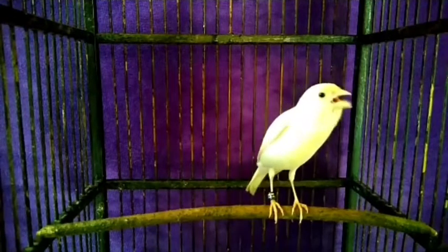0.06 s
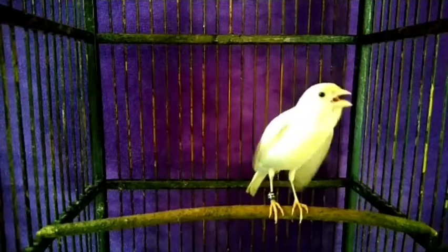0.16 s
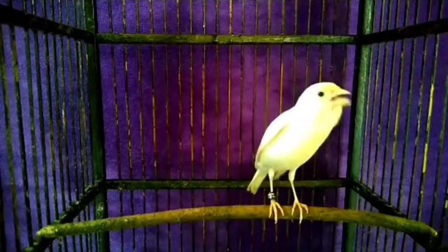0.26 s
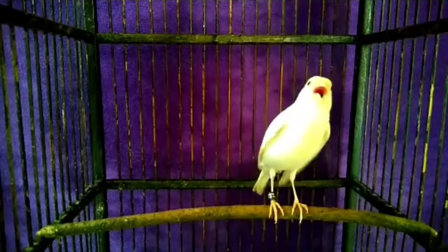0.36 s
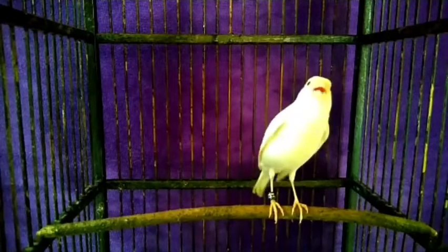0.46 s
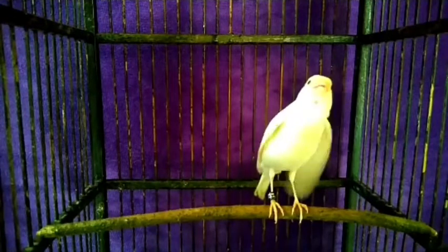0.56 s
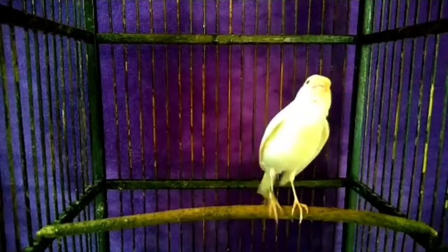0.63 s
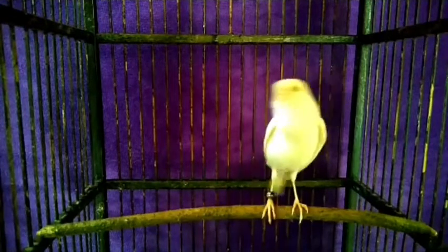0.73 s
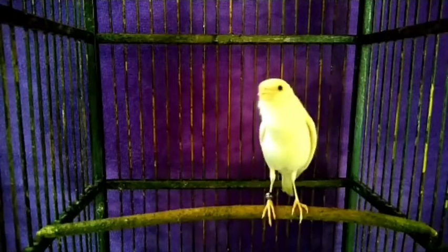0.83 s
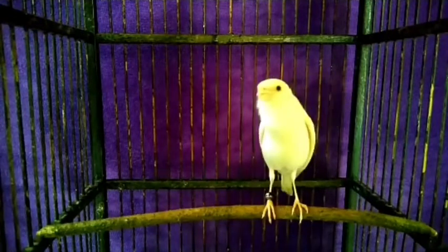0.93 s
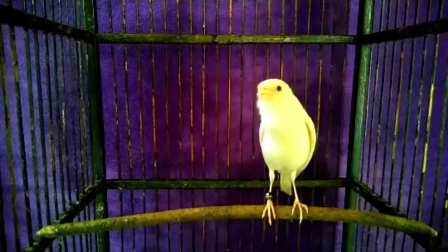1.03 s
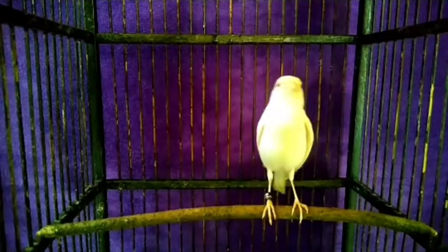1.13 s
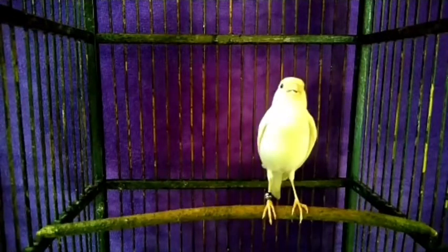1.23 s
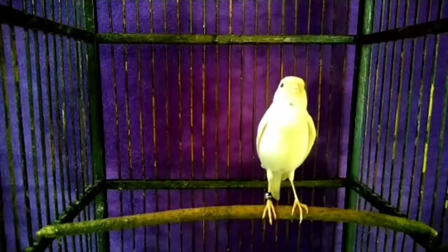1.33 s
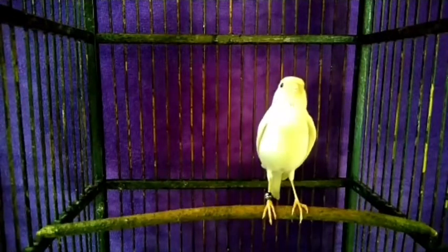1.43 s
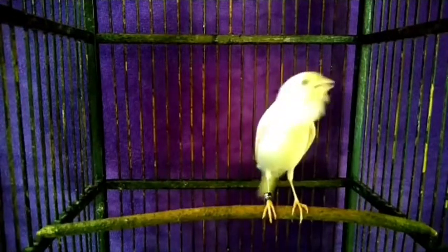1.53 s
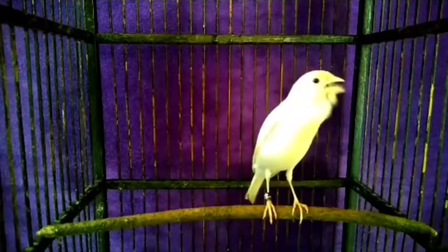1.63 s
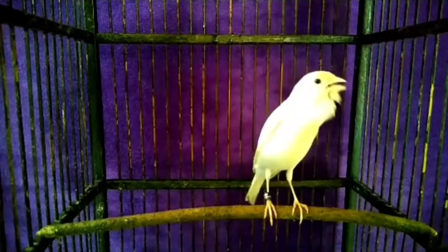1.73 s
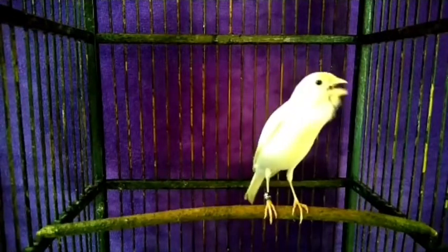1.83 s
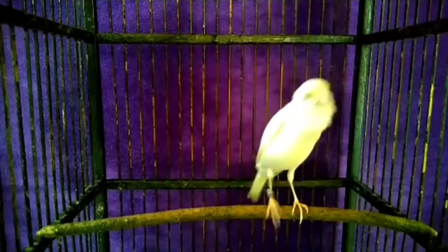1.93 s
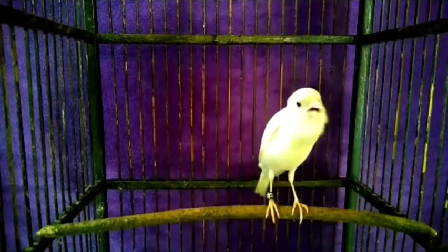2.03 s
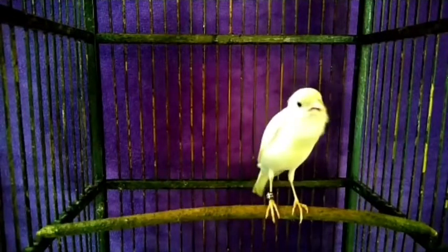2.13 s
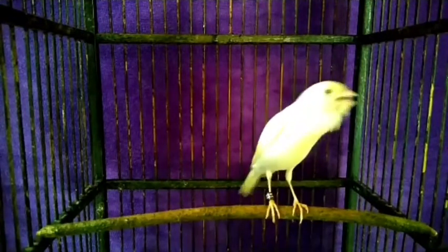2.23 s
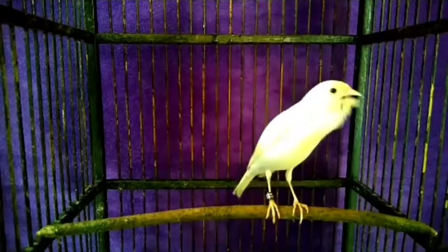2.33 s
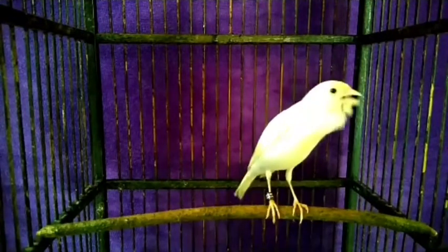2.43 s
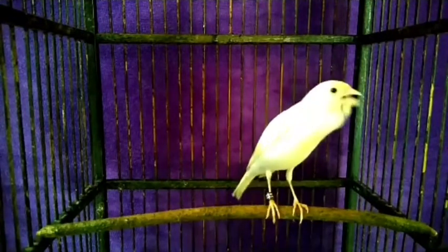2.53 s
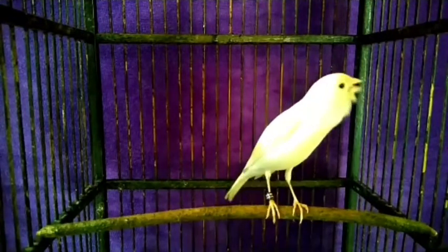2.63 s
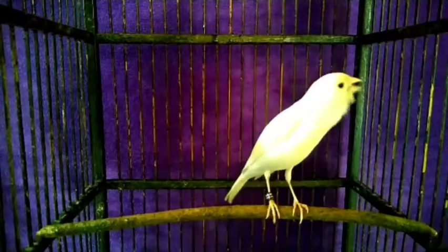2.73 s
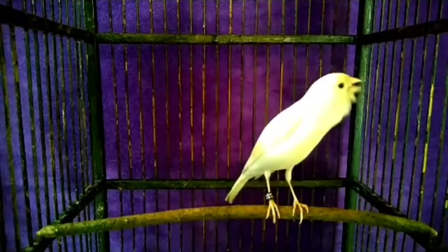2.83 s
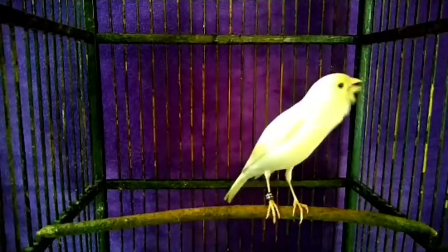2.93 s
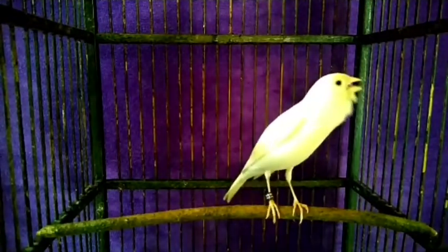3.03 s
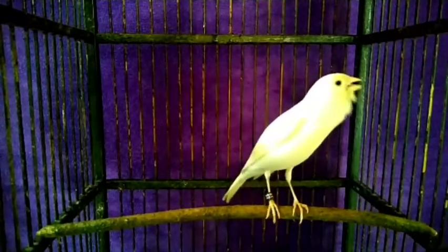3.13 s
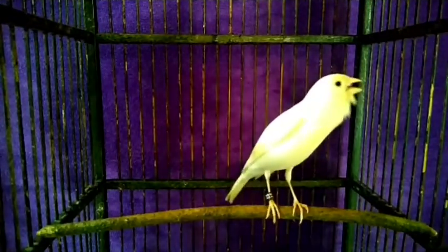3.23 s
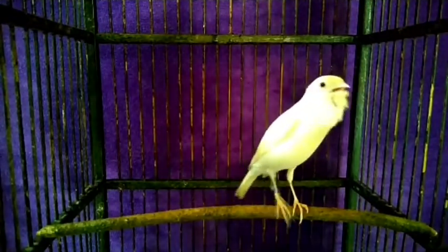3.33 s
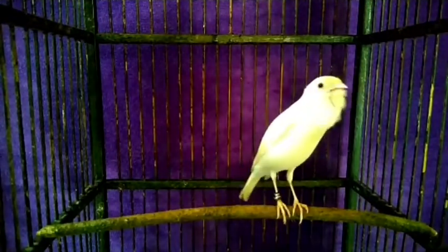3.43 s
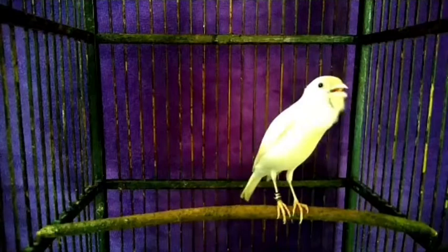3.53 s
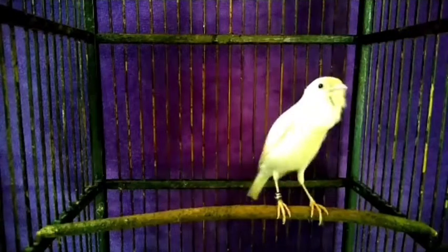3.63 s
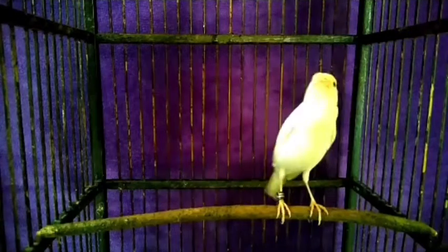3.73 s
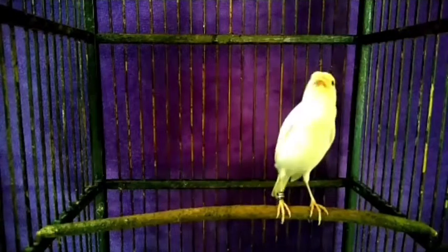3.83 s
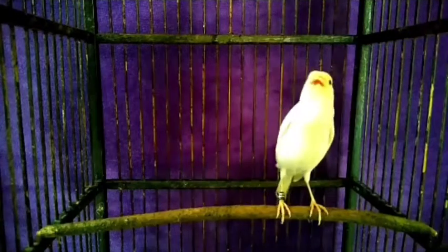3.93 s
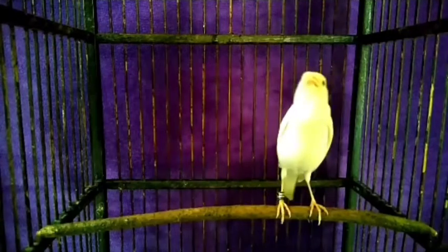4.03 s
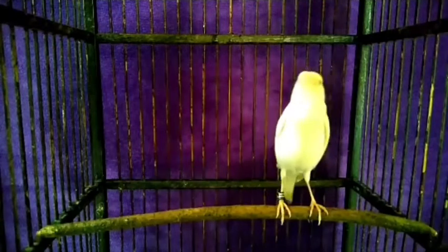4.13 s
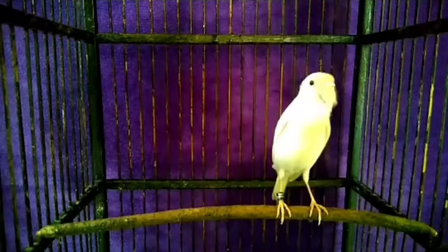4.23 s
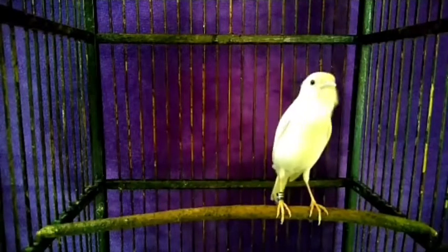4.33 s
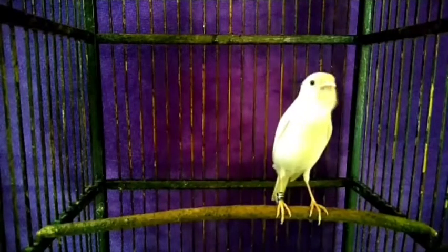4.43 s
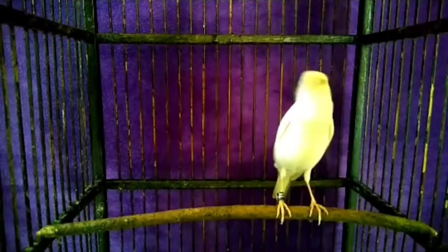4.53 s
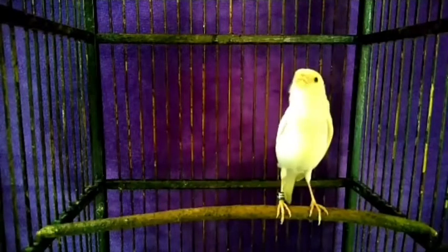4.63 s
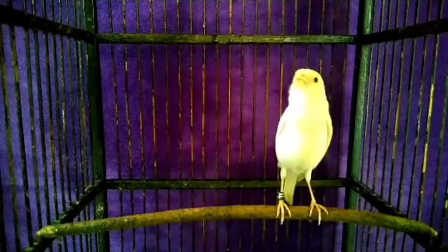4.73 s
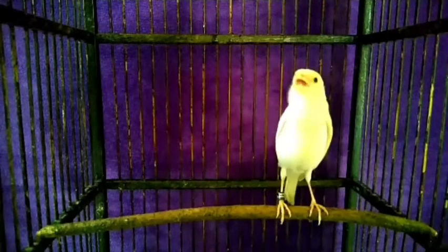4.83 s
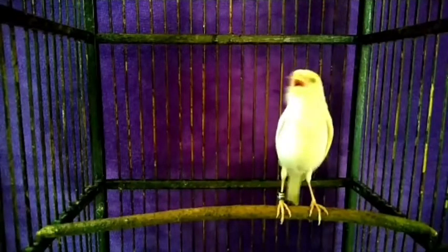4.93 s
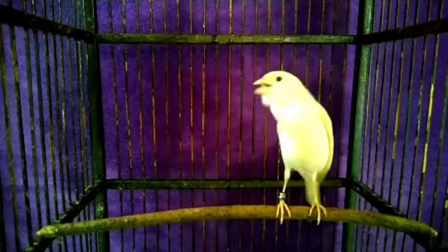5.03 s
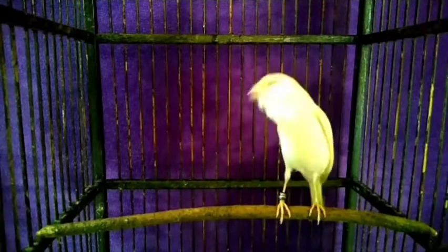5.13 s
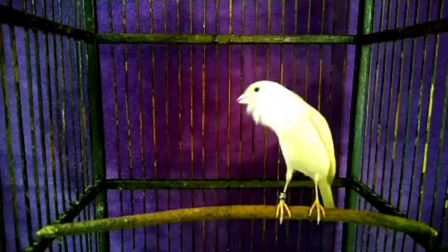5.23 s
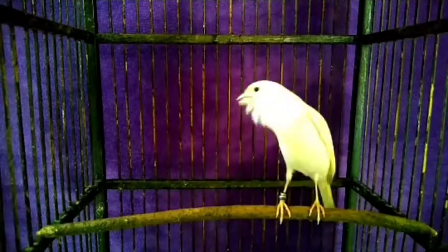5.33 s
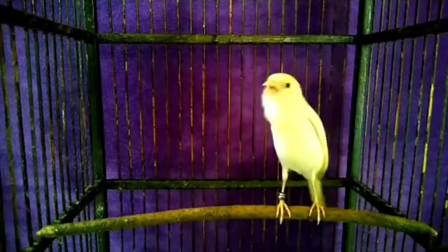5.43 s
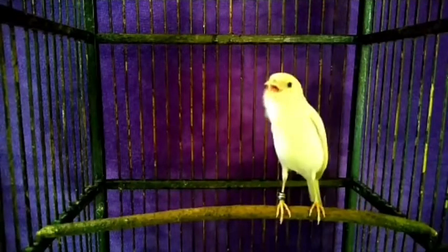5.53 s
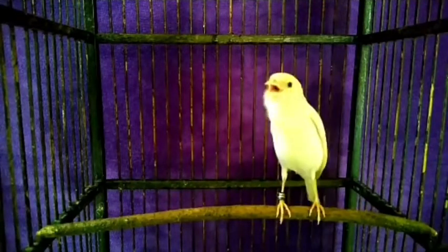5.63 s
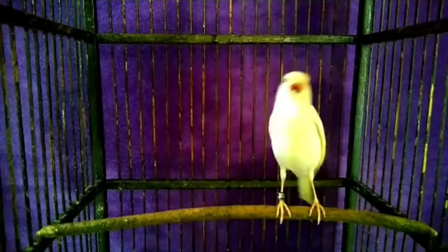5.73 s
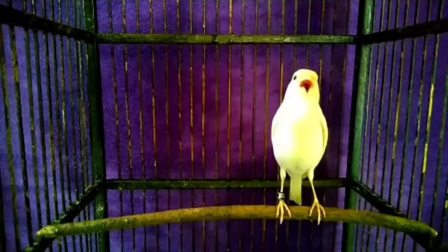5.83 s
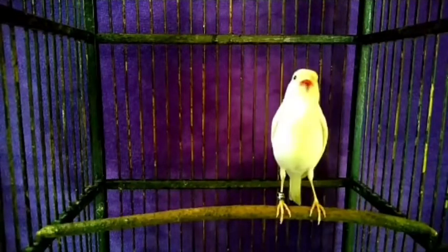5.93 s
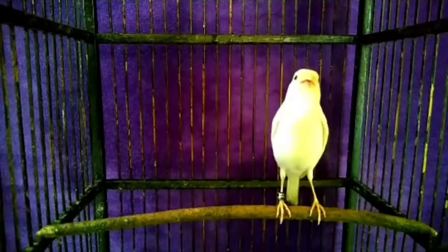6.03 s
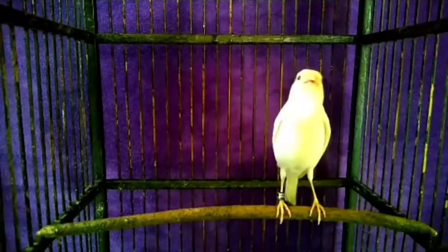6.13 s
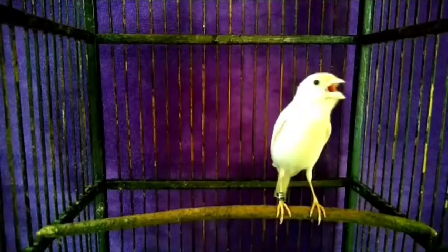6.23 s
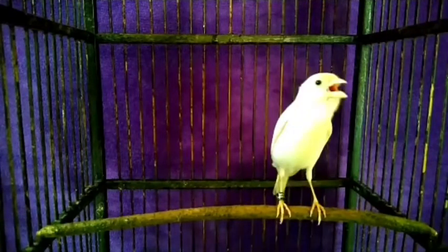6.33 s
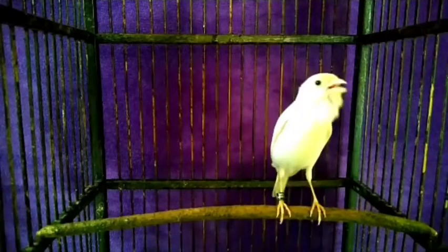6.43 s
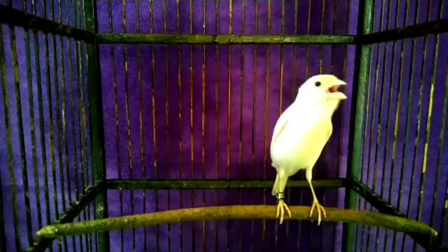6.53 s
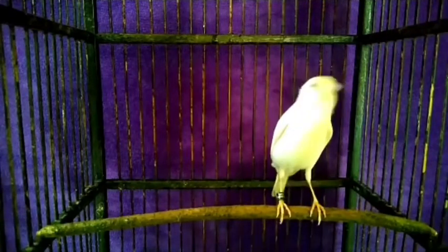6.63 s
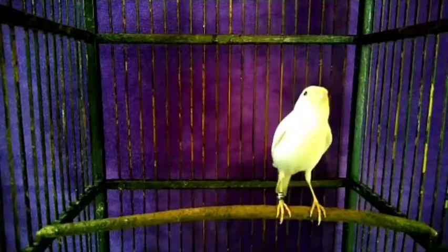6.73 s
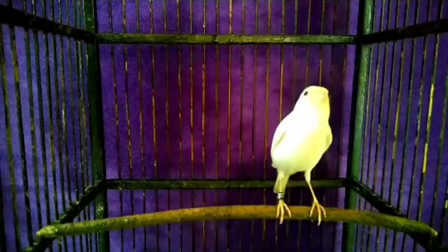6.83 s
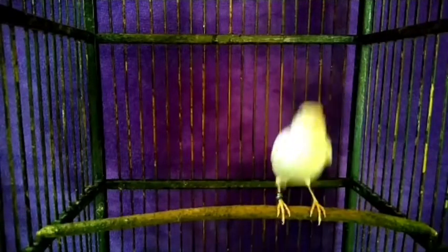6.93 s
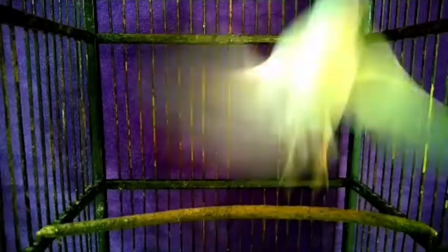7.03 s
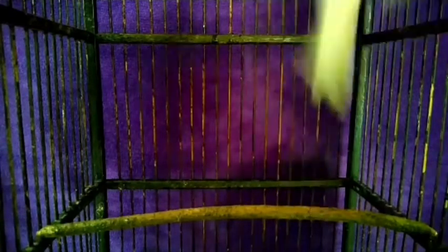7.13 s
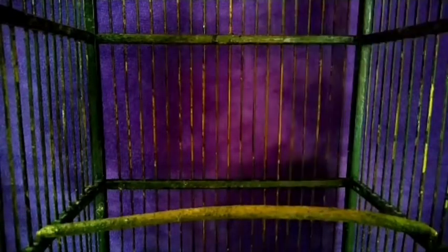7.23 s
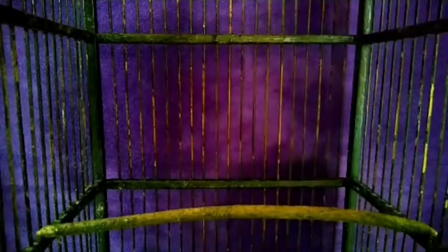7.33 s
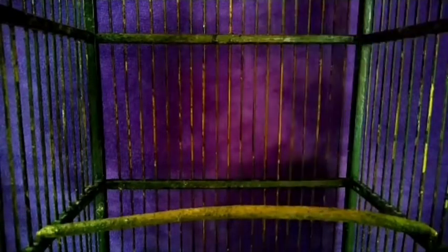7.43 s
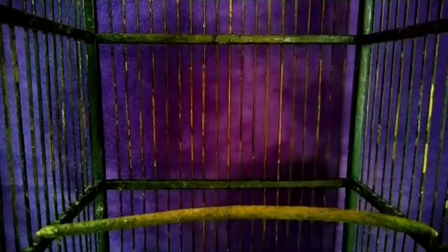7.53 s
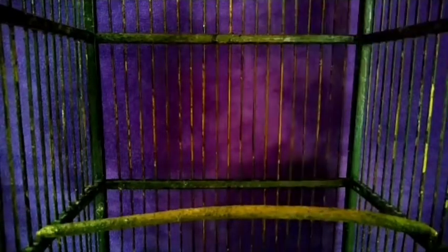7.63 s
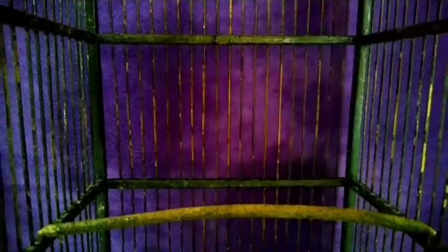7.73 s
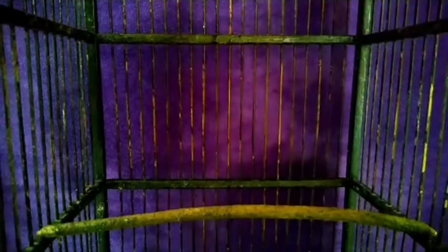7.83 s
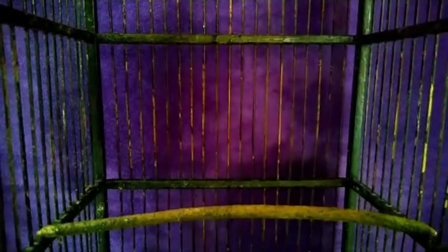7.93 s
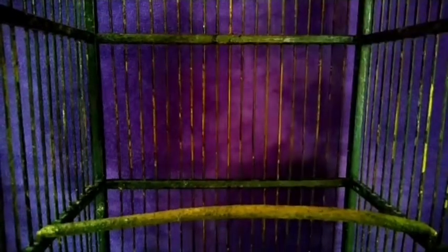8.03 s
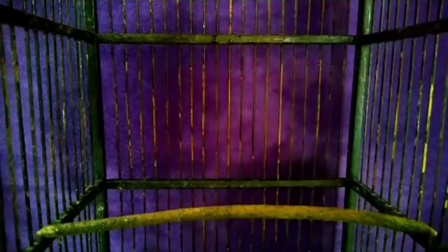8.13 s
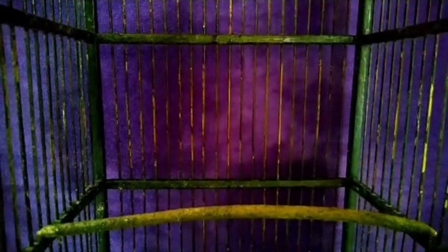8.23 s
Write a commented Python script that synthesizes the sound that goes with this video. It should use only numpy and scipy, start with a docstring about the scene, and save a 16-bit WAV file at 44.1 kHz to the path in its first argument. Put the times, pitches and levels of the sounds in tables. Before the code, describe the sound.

Bright, slightly overloaded canary song of whistles and fast gliding trills in a small hard room, ending in wing flutter, cage knocks and faint distant bird calls.

```python
"""Caged canary in a small hard room

A close canary sings rising whistles, then fast trills of gliding syllables; a dove and small birds call far off.
Each trill repeats one learnt gesture of the syrinx: a nearly pure tone along pitch and level curves.
Dense noise echoes make the room ring on at the song's pitches; loud notes overload the microphone.
Late on, the bird flutters off its perch: puffs of low-pitched noise, and knocks that ring the cage's modes."""
import sys
import numpy as np
from scipy import signal
from scipy.fft import rfft, irfft
from scipy.io import wavfile
from scipy.ndimage import uniform_filter1d, minimum_filter1d

SR = 44100
rng = np.random.default_rng(int(sys.argv[2]) if len(sys.argv) > 2 else 0)


def log_audio(samples):
    """Write samples as a 16-bit WAV file to the path given in sys.argv[1]."""
    # one column per channel
    frames = np.atleast_2d(samples).T
    # limit to full scale, then quantise
    limited = np.clip(frames, -1, 1)
    pcm = np.round(limited * 32767).astype(np.int16)
    wavfile.write(sys.argv[1], SR, pcm)


N = 364707
T_S = np.arange(N) / SR

# Levels in the tables are relative; pitch factors and lengths rescale the gestures.
# Syllable gestures of the syrinx: t/s, f/Hz, level/dB
WHISTLE_GESTURE = [(0, 3953, -23.5), (.004, 4682, 2), (.012, 4520, -1), (.022, 4820, -16),
                   (.046, 5720, -25.5), (.055, 6314, -16), (.061, 6815, -5.5), (.085, 7167, -7.5),
                   (.11, 7490, -0.5), (.138, 7550, -5), (.155, 7385, -15.5)]
CHIP_GESTURE = [(0, 3835, -18), (.0034, 3400, -3.5), (.0068, 3093, 3), (.01, 2882, 3), (.0122, 2450, -5),
                (.0142, 2049, -10.5), (.0175, 1760, -35)]
SWEEP_GESTURE = [(0, 6029, -23), (.004, 5635, 2.5), (.009, 5183, 0.5), (.013, 4781, 1), (.019, 4348, -2.5),
                 (.024, 4062, -2.5), (.029, 3700, -3.5), (.033, 3443, 2), (.038, 3340, -11.5)]
ARCH_GESTURE = [(0, 3653, -19.5), (.0022, 4439, 10.5), (.005, 5049, 1), (.008, 5951, -15.5),
                (.011, 4891, -9), (.019, 4600, -18.5), (.031, 4005, -2.5), (.04, 3534, -9)]
DROP_GESTURE = [(0, 3038, -28), (.004, 2902, -6), (.0085, 2793, 0), (.011, 2327, -9.5), (.013, 1980, -2.5),
                (.016, 1450, -20), (.021, 946, -36)]
SLUR_GESTURE = [(0, 4582, -23), (.005, 5137, -11.5), (.014, 6214, -23.5), (.031, 5475, -13),
                (.045, 4618, 2), (.054, 4349, -4), (.064, 3633, -22)]
HIGH_GESTURE = [(0, 8150, -23.5), (.006, 7560, -3), (.02, 6929, 2.5), (.03, 5950, -17.5), (.0395, 5050, 6),
                (.046, 4750, -27.5)]
LOW_GESTURE = [(0, 3818, -26.5), (.0055, 3400, -12), (.008, 3243, -2), (.013, 3033, 0.5),
               (.0152, 2550, -15.5), (.0178, 2236, -8.5), (.022, 1676, -33)]
RISE_GESTURE = [(0, 4391, -10), (.009, 4799, -2.5), (.022, 5051, -1.5), (.034, 5805, -4), (.048, 6825, 2),
                (.068, 6980, 1), (.088, 6850, -1.5), (.1, 6716, -18)]

# Syllables placed one by one: start/s, length/s, pitch factor, level/dB
WHISTLE_SYLLABLES = [(-.021, 0.139, 0.9996, 0.5), (.157, 0.151, 0.999, 0.5), (.343, .152, 0.9996, 1)]
LEAD_DROP_SYLLABLE = [(3.485, .014, 1, 1)]  # leads into the alternating trill
SLUR_SYLLABLES = [(4.712, 0.0559, 0.9034, -0.74), (4.82, 0.062, 0.9893, 2.3), (4.943, .064, 1.03, .3),
                  (5.071, 0.0629, 1.0226, -1.64)]
RISE_SYLLABLES = [(6.207, .111, .995, 1.32), (6.355, .091, 1.012, 0.54), (6.507, .09, 1.015, 1.2)]

# Trill tempo, slackening overall: t/s, time to the next syllable/s
CHIP_TEMPO = [(0.5599, 0.0283), (0.589, 0.0348), (0.7, 0.038), (0.86, 0.0424), (1.03, 0.0437),
              (1.2, 0.0447)]
SWEEP_TEMPO = [(1.5604, 0.0635), (1.625, 0.0644), (1.9, 0.0646), (2.5, 0.066), (2.7, 0.0675),
               (2.95, 0.0694), (3.15, 0.0695), (3.29, 0.0755)]
ARCH_TEMPO = [(3.5172, 0.0759), (3.75, 0.0793), (3.91, 0.079), (4.15, 0.0867), (4.3, 0.0955),
              (4.45, 0.0926), (4.612, 0.0972)]
HIGH_TEMPO = [(5.2063, 0.1118), (5.43, 0.1095), (5.65, 0.1099), (5.87, 0.1127), (6.095, 0.1143)]

# Change of the syllables along a trill: t/s, syllable length/s, pitch factor, level/dB
CHIP_COURSE = [(0.55, 0.0079, 0.874, -12), (0.588, 0.01123, 0.981, 2), (0.697, 0.01605, 0.9615, 4),
               (0.867, 0.0211, 0.9642, 4), (1.028, .02, 0.9787, 4.5), (1.205, 0.02038, 0.975, 2)]
SWEEP_COURSE = [(1.56, .039, 0.9695, -5), (1.625, 0.034, 1, 1), (1.9, 0.03796, 1.0028, 3.5),
                (2.5, .036, 1.0065, 2.5), (2.7, 0.0372, 1.015, -4), (2.851, .04, 0.971, -1.5),
                (2.95, 0.03815, 1.011, -1), (3.08, .04, 1, -2), (3.146, 0.0347, 1.0435, -1.5),
                (3.22, 0.03944, 0.9894, -2), (3.44, 0.0377, 0.985, -2)]
ARCH_COURSE = [(3.517, 0.03398, 0.997, -5.5), (3.75, 0.03506, 0.98, -2), (3.91, 0.0358, 0.9824, -6),
               (4.15, 0.0394, 1.012, -1), (4.301, .043, 1.01, 1), (4.45, 0.04257, 1.0046, 4.5),
               (4.612, 0.05026, 1.027, -1)]
HIGH_COURSE = [(5.206, 0.0415, 0.9686, -1), (5.431, 0.0416, 0.9875, 3), (5.651, 0.04012, 0.9878, 1.5),
               (5.87, .043, 0.9737, 3.5), (6.095, 0.03886, 0.981, 2)]
# Same columns, for the low syllables that answer the high ones
DROP_COURSE = [(3.56, 0.0193, 0.9935, 2), (3.72, 0.02024, 1, 1.5), (3.85, 0.0202, 0.947, -0.5),
               (4.2, 0.01898, 0.9564, -.5), (4.47, .02, .97, 0.5), (4.67, 0.01993, 0.971, -1)]
LOW_COURSE = [(4.78, 0.02173, 0.795, 0), (4.89, 0.0193, 0.8996, 0.5), (5.05, 0.02317, 0.9537, 2.5),
              (5.3, 0.01794, 0.992, -.5), (5.55, .021, 0.9852, -0.5), (6.14, 0.02156, 0.96, -3)]
DROP_GAP_S, LOW_GAP_S = 0.0075, 0.007  # pause before the answer

# Single notes that slide to a held pitch: start/s, length/s, first f/Hz, held f/Hz, slide/s, level/dB
SLIDE_NOTES = [(0, 0.0135, 4668, 4450, 0.0037, 2.5), (1.315, 0.0292, 5170, 5840, 0.0016, 4.5),
               (1.362, 0.092, 2617, 2487, 0.01408, -5.5), (1.432, 0.1044, 2530, 2503, 0.0192, -8),
               (3.215, 0.01224, 4304, 5315, 0.00153, 1), (3.362, 0.0092, 4218, 5092, .002, 4),
               (3.439, .012, 4294, 4902, .002, 7), (6.319, 0.0317, 6926, 2779, .004, -2.5),
               (6.483, 0.0375, 3414, 3594, 0.00455, -1)]
ATTACK_SHARE, RELEASE_SHARE, EDGE_DB = 0.11, 1, -17  # shares of the note's length; depth of both

# Far calls: start/s, length/s, first f/Hz, last f/Hz, level/dB
COO_CALLS = [(0, 0.0423, 788.4, 675.6, -35), (.375, 0.0254, 873, 679, -42), (6.77, 0.074, 455, 410.4, -56),
             (7.265, 0.0738, 706.7, 680.3, -32.5), (7.325, 0.028, 902, 1000, -49),
             (7.62, 0.026, 788, 890, -44.5), (7.72, 0.02, 848.6, 834.7, -42),
             (7.915, 0.0366, 886.7, 954, -43), (8.005, 0.0234, 759, 593, -48.5)]
PEEP_CALLS = [(7.655, 0.05, 2930, 2684, -46.5), (7.69, 0.032, 2910, 2736, -44),
              (7.755, 0.0218, 2838, 2600, -53), (7.79, 0.0324, 2660, 2500, -45),
              (8.13, 0.057, 3342, 3250, -27), (8.15, 0.0523, 3550, 3805, -45),
              (8.2, 0.065, 3325, 3935, -34)]

# Near surfaces: delay/s, level/dB
WALL_ECHOES = [(.00105, -15), (.0023, -26), (.016, -31.5)]
# Colour of the dense echoes: f/Hz, level/dB
ROOM_COLOUR = [(700, 6.5), (1300, 5), (2200, -2.5), (3400, 1), (4500, -3), (7400, 0), (8800, 7.5),
               (15000, -6.5)]
ROOM_T60_S, ROOM_DB = 0.391, -10.5  # room tail
EARLY_T60_S, EARLY_DB = 0.094, -14.5  # quick cage echoes
TREBLE_T60_S, TREBLE_DB = 0.14, 2.5

# Background noise spectrum: f/Hz, level/dB
BACKGROUND_SPECTRUM = [(15, -35), (25, -3.5), (101, -2.5), (221, -8), (289, -5), (340, -6.5), (684, -15),
                       (1950, -17.5), (4260, -26), (6050, -21.5), (7500, -25), (12500, -21.5), (15500, -39)]
BACKGROUND_DB = -56.5

# Cage resonances: f/Hz, level/dB, t60/s
FRAME_MODES = [(1914, 1, 0.123), (2070, -2.5, 0.11), (2295, 2.5, 0.078), (4800, -10, 0.0684),
               (5810, -4.5, 0.1064), (6840, -1, 0.051), (8700, -13.5, 0.091), (9660, -11.5, 0.0604),
               (12800, -14.5, .07)]
WIRE_MODES = [(3988, -0.5, 0.22), (5800, 5.5, 0.07), (6240, -6, 0.11), (7600, -1, 0.078), (8510, 2, 0.063),
              (10900, -3, 0.045), (11600, 1.5, 0.025), (12500, -3.5, 0.033), (14100, -12.5, 0.055)]
# Feet on the frame, claws on the wires: t/s, level/dB
FRAME_KNOCKS = [(7.053, -63), (7.078, -55), (7.17, -62), (7.475, -50)]
WIRE_TICKS = [(7.12, -71.5), (7.228, -51), (7.244, -53), (7.261, -64.5)]

# Wing beats: t/s, width/s, level/dB
WING_BEATS = [(7.098, 0.013, -40), (7.131, 0.0167, -28.5), (7.19, 0.034, -37), (7.255, .025, -43.5)]
# Spectrum of the wing puffs: f/Hz, level/dB
WING_SPECTRUM = [(15, -32), (25, -10), (63, -0.5), (123, -9), (161, -9.5), (199, -17), (539, -48),
                 (600, -50.5), (780, -80), (1320, -120)]

TOP_HZ = 15650


def undb(db):
    """Decibels to gain."""
    return 10 ** (np.asarray(db) / 20)


def add(out, start_s, sound):
    """Mix a sound in at a time, cut to fit."""
    i = int(round(start_s * SR))
    sound, i = sound[max(-i, 0):], max(i, 0)
    out[i:i + len(sound)] += sound[:max(N - i, 0)]


def colour(x, spectrum):
    """Filter by a spectrum of (Hz, dB) points, interpolated over log frequency."""
    hz, db = np.transpose(spectrum)
    f_hz = np.maximum(np.arange(len(x) // 2 + 1) * SR / len(x), 1)
    gain = undb(np.interp(np.log(f_hz), np.log(hz), db))
    return irfft(rfft(x) * gain, len(x))


def noise(spectrum):
    """Coloured noise of rms 1."""
    x = colour(rng.standard_normal(N), spectrum)
    return x / x.std()


def waver(n, size):
    """Smooth chance of spread 1 that changes over about size samples."""
    smooth = uniform_filter1d(uniform_filter1d(rng.standard_normal(n), size), size)
    return smooth * np.sqrt(size / (2 / 3))


def syrinx(t_s, hz, db, jitter=0.0036, shimmer_db=1.96, second_db=-34, third_db=-44, strain_db=14):
    """Nearly pure tone along a gesture; weak overtones grow by strain_db an octave up to 4800 Hz."""
    u_s = np.arange(0, max(t_s[-1], .004), 1 / SR)
    glide_hz = uniform_filter1d(np.interp(u_s, t_s, hz), size=90)
    pitch_hz = glide_hz * (1 + jitter * waver(len(u_s), size=60))
    phase = 2 * np.pi * np.cumsum(pitch_hz) / SR
    gate = np.clip(np.minimum(u_s, u_s[-1] - u_s) / 0.001, 0, 1)
    level_db = np.interp(u_s, t_s, db) + shimmer_db * waver(len(u_s), size=120)
    loudness = undb(level_db) * np.sin(gate * np.pi / 2) ** 2
    overtones = 0
    for k, partial_db in enumerate([second_db, third_db], 2):
        overtones = overtones + undb(partial_db) * (k * pitch_hz < SR / 2) * np.sin(k * phase)
    strain = undb(strain_db * np.log2(np.minimum(pitch_hz / 4800, 1)))
    return loudness * (np.sin(phase) + strain * overtones)


def slides():
    """Single notes: the pitch settles quickly and holds while the note swells, then fades."""
    out, u = np.zeros(N), np.linspace(0, 1, 50)
    edge = np.maximum(np.maximum(1 - u / ATTACK_SHARE, 1 - (1 - u) / RELEASE_SHARE), 0)
    for start_s, length_s, first_hz, held_hz, slide_s, db in SLIDE_NOTES:
        hz = held_hz + (first_hz - held_hz) * np.exp(-u * length_s / slide_s)
        add(out, start_s, syrinx(u * length_s, hz, db + EDGE_DB * edge))
    return out


def glance(sound, echo_db=-12, shortest_s=.0005, longest_s=.003):
    """Echo off the cage, its path redrawn per syllable as the head turns; it ripples a glide's level."""
    lag = int(SR * (shortest_s + (longest_s - shortest_s) * rng.random()))
    return np.pad(sound, (0, lag)) + undb(echo_db) * np.pad(sound, (lag, 0))


def trill(gesture, syllables, level_db, pitch_scatter=.006, scatter_db=0.63):
    """One gesture repeated, never quite the same in pitch and force."""
    out = np.zeros(N)
    t_s, hz, db = np.transpose(gesture)
    for start_s, length_s, pitch, force_db in syllables:
        sharp, strong = rng.standard_normal(2)
        sung_hz = hz * pitch * (1 + pitch_scatter * sharp)
        sung_db = db + force_db + level_db + scatter_db * strong
        tone = syrinx(t_s * length_s / t_s[-1], sung_hz, sung_db)
        add(out, start_s, glance(tone))
    return out


def at(course, s):
    """Values of a course at one moment."""
    times, *columns = np.transpose(course)
    return [np.interp(s, times, column) for column in columns]


def beats(tempo, count):
    """Start times of a trill's syllables: each comes one beat after the last."""
    starts_s = [tempo[0][0]]
    while len(starts_s) < count:
        starts_s.append(starts_s[-1] + at(tempo, starts_s[-1])[0])
    return starts_s


def phrase(starts_s, course):
    """Syllables (start, length, pitch, level), shaped by the course of their trill."""
    return [(start_s, *at(course, start_s)) for start_s in starts_s]


def answers(syllables, course, gap_s):
    """A low syllable follows each high one after a short pause."""
    starts_s = [start_s + length_s + gap_s for start_s, length_s, _, _ in syllables]
    return phrase(starts_s, course)


def canary():
    """The song: whistles, two plain trills, alternating high and low trills, closing rises; slides."""
    chips = phrase(beats(CHIP_TEMPO, count=17), CHIP_COURSE)
    sweeps = phrase(beats(SWEEP_TEMPO, count=29), SWEEP_COURSE)
    arches = phrase(beats(ARCH_TEMPO, count=14), ARCH_COURSE)
    highs = phrase(beats(HIGH_TEMPO, count=9), HIGH_COURSE)
    drops = list(LEAD_DROP_SYLLABLE) + answers(arches, DROP_COURSE, DROP_GAP_S)
    lows = answers(list(SLUR_SYLLABLES) + highs, LOW_COURSE, LOW_GAP_S)
    out = trill(WHISTLE_GESTURE, WHISTLE_SYLLABLES, level_db=1.97)
    out += trill(CHIP_GESTURE, chips, level_db=-4.0)
    out += trill(SWEEP_GESTURE, sweeps, level_db=0.0846)
    out += trill(ARCH_GESTURE, arches, level_db=0.53)
    out += trill(DROP_GESTURE, drops, level_db=3.0)
    out += trill(SLUR_GESTURE, SLUR_SYLLABLES, level_db=4.5)
    out += trill(HIGH_GESTURE, highs, level_db=-0.1655)
    out += trill(LOW_GESTURE, lows, level_db=2.62)
    out += trill(RISE_GESTURE, RISE_SYLLABLES, level_db=0.0056)
    return out + slides()


def air(song, hiss_db=-47):
    """Air rushing through the syrinx hisses faintly in step with the notes."""
    envelope = uniform_filter1d(np.abs(song), size=60)
    hiss = noise([(1000, -28.0), (3000, -9), (9000, 9), (15000, -7.5)])
    return undb(hiss_db) * envelope * hiss


def far_calls(calls, edge_db):
    """Dove or small birds: short glides that swell and fade."""
    out = np.zeros(N)
    for start_s, length_s, first_hz, last_hz, db in calls:
        t_s = [0, length_s / 2, length_s]
        hz = [first_hz, (first_hz + last_hz) / 2, last_hz]
        add(out, start_s, syrinx(t_s, hz, [db + edge_db, db, db + edge_db], jitter=0.016))
    return out


def echoes(t60_s, build_s):
    """Dense cloud of reflections that builds up and decays, with energy 1."""
    t_s = T_S[:SR]
    decay = np.exp(-np.log(1000) * t_s / t60_s)
    h = rng.standard_normal(SR) * decay * (1 - np.exp(-(t_s / build_s) ** 2))
    return h / np.sqrt(np.sum(h ** 2))


def room(x, direct):
    """Direct sound, a few near surfaces, quick early echoes and the room's tail."""
    cloud = undb(ROOM_DB) * echoes(ROOM_T60_S, build_s=0.0051)
    cloud += undb(EARLY_DB) * echoes(EARLY_T60_S, build_s=0.0023)
    h = colour(cloud, ROOM_COLOUR)[:-SR // 10]  # drop the filter's wrapped end
    # the beak beams the overtones past the microphone, so they return mostly as short-lived echoes
    highpass = signal.butter(10, 8800, "high", fs=SR, output="sos")
    treble = signal.sosfilt(highpass, echoes(TREBLE_T60_S, build_s=0.007))
    h += undb(TREBLE_DB) * treble[:len(h)]
    h[0] += direct
    for delay_s, db in WALL_ECHOES:
        h[int(delay_s * SR)] += undb(db)
    return signal.fftconvolve(x, h)[:N]


def background():
    """Quiet steady coloured noise."""
    return undb(BACKGROUND_DB) * noise(BACKGROUND_SPECTRUM)


def knocks(modes, hits, scrape_s):
    """A brief noisy scrape on a part of the cage excites its decaying modes."""
    out, t_s = np.zeros(N), T_S[:SR // 2]
    ring = np.zeros(len(t_s))
    for hz, db, t60_s in modes:
        ring += undb(db) * np.sin(2 * np.pi * hz * t_s) * np.exp(-np.log(1000) * t_s / t60_s)
    for start_s, db in hits:
        scrape = rng.standard_normal(len(t_s)) * np.exp(-t_s / scrape_s)
        hit = signal.fftconvolve(ring, scrape)
        add(out, start_s, undb(db) * hit / hit[:SR // 20].std())  # rms over the first 50 ms
    return out


def wings():
    """Each wing beat pushes a puff of air at the microphone: noise under Gaussian pulses."""
    puffs = sum(undb(db) * np.exp(-.5 * ((T_S - s) / width_s) ** 2) for s, width_s, db in WING_BEATS)
    return noise(WING_SPECTRUM) * puffs


def scene():
    """Near bird and cage, far birds with less direct sound, wings and background; all in the centre."""
    song = canary()
    far = far_calls(COO_CALLS, edge_db=-2.5) + far_calls(PEEP_CALLS, edge_db=-7.5)
    cage = knocks(FRAME_MODES, FRAME_KNOCKS, scrape_s=0.0067)
    cage += knocks(WIRE_MODES, WIRE_TICKS, scrape_s=0.00298)
    mix = room(song + air(song) + cage, direct=0.722)
    mix += room(far, direct=0.497)
    mix += background() + wings()
    return np.array([mix, mix])


def limiter(x, threshold=0.995, slope=0.18):
    """Very fast gain control that takes back part of every peak over the threshold."""
    peak = uniform_filter1d(-minimum_filter1d(-np.abs(x), size=44), size=44)
    return x / np.maximum(peak / threshold, 1) ** slope


def record(dry, ceiling=0.8911, lopsided=0.012):
    """Loud notes are limited, then clip a little sooner on the positive side; the top is cut."""
    clipped = np.clip(limiter(dry), -ceiling - lopsided, ceiling - lopsided)
    lowpass = signal.ellip(10, .1, 70, TOP_HZ, fs=SR, output="sos")
    return signal.sosfilt(lowpass, clipped)


dry = scene()
out = record(dry)
log_audio(out)
```